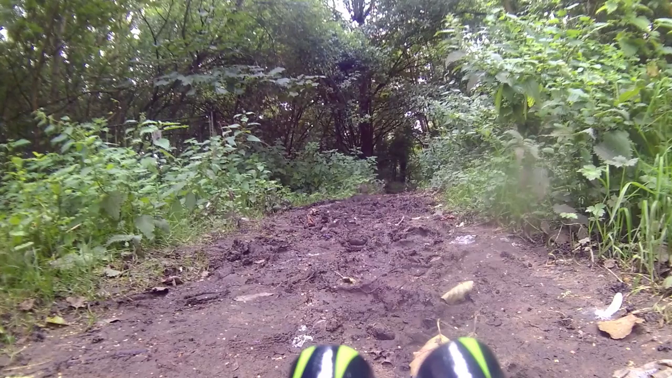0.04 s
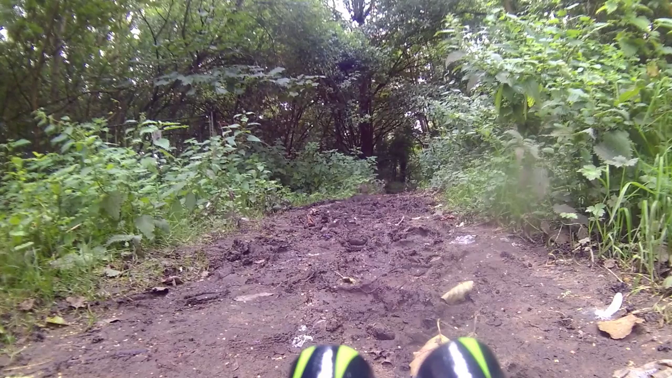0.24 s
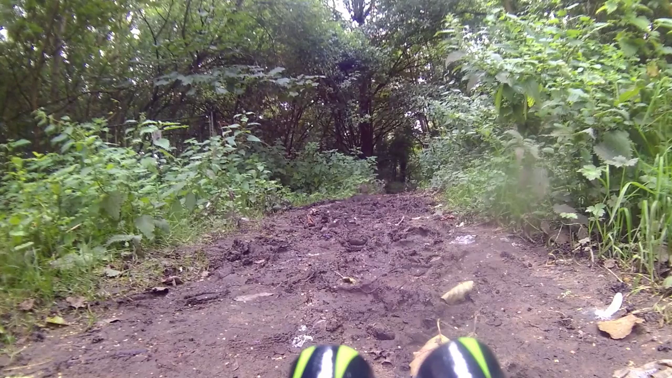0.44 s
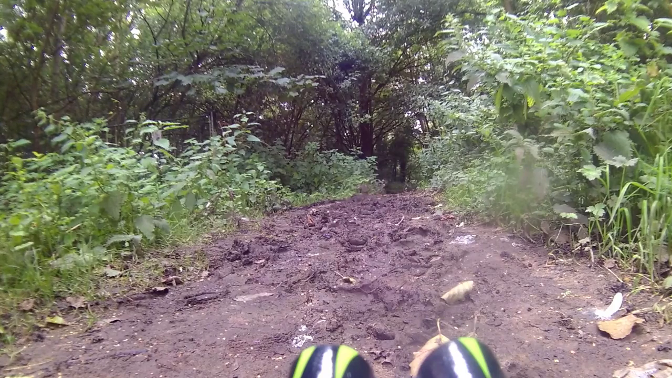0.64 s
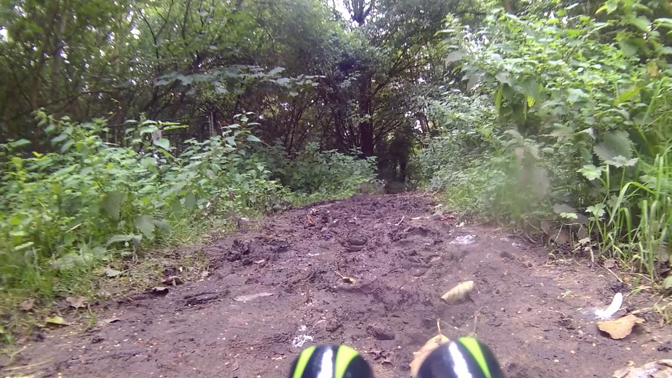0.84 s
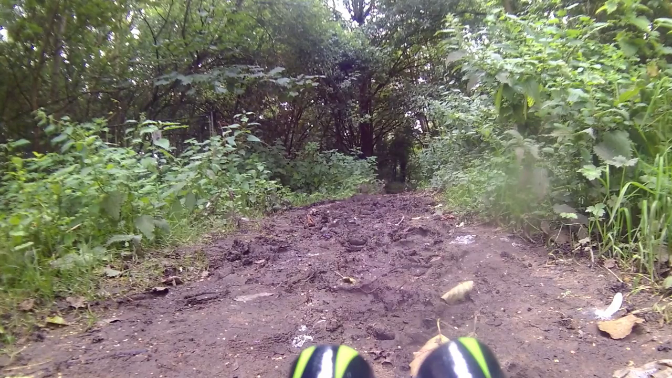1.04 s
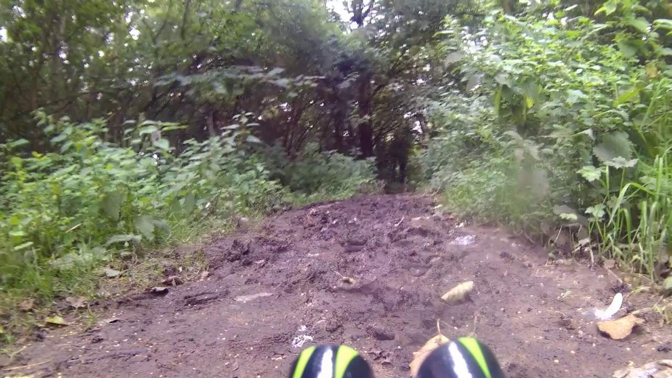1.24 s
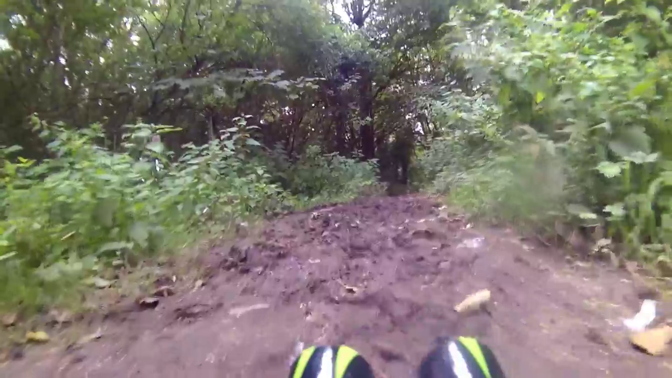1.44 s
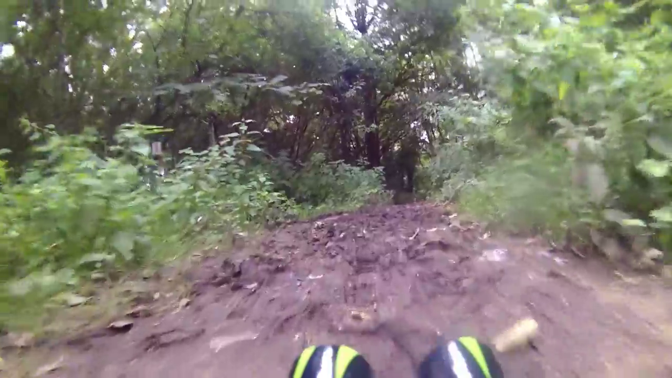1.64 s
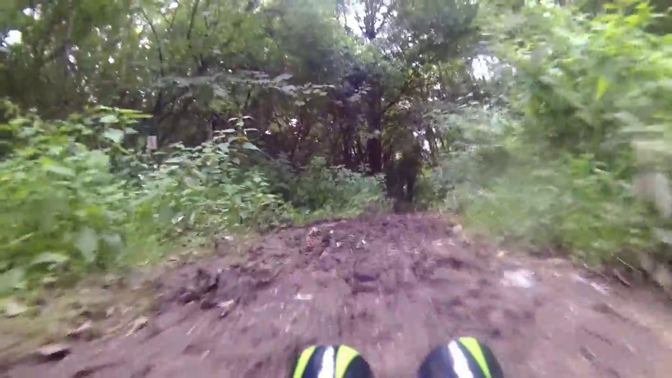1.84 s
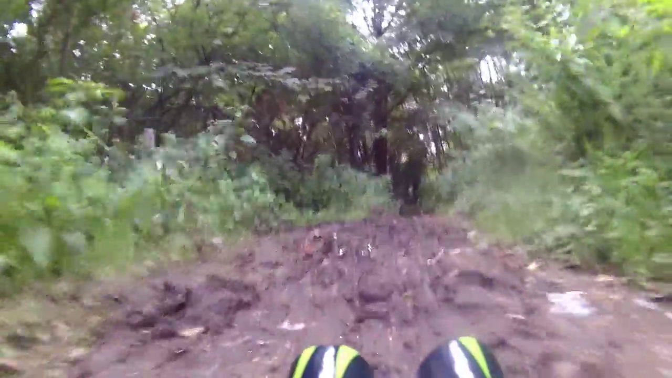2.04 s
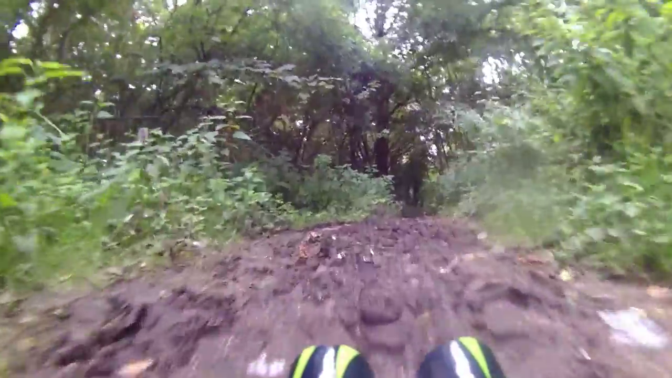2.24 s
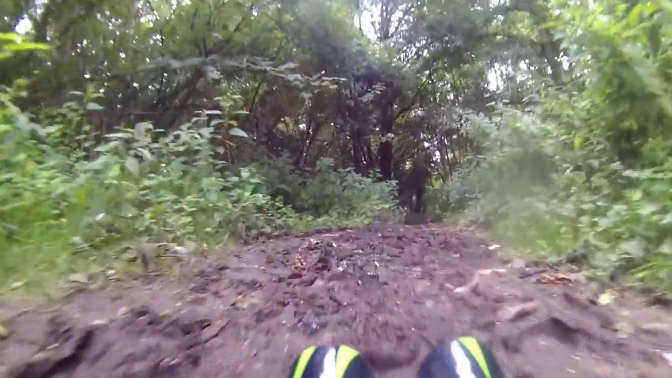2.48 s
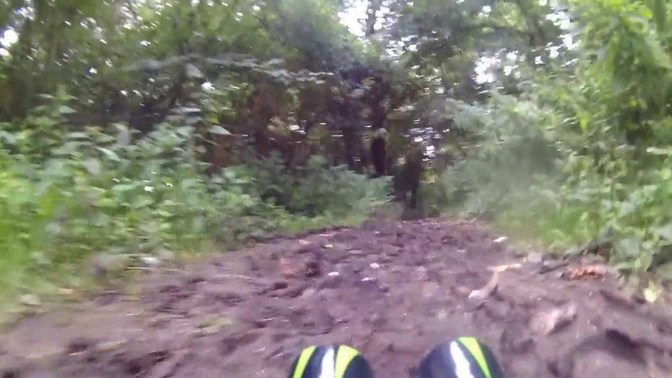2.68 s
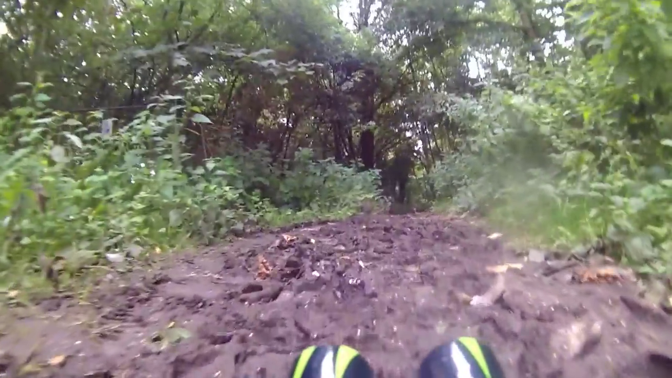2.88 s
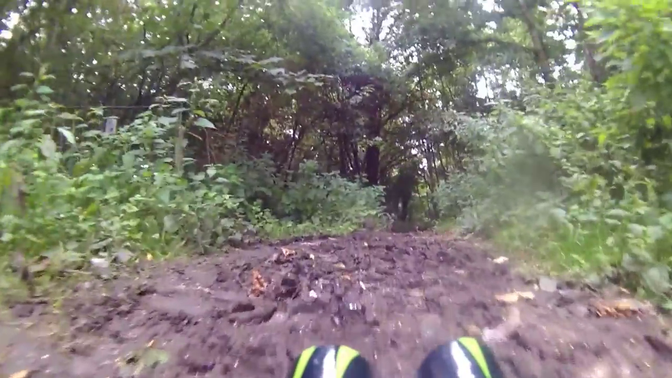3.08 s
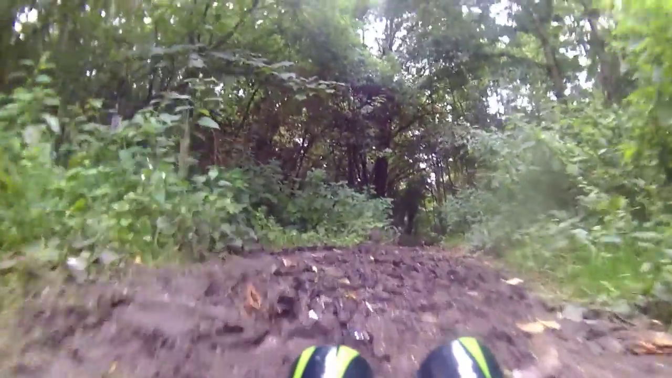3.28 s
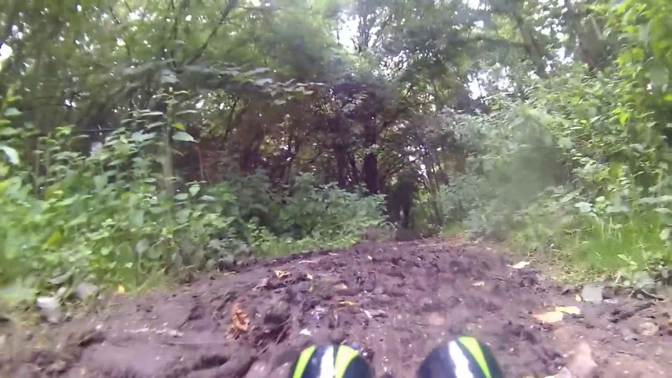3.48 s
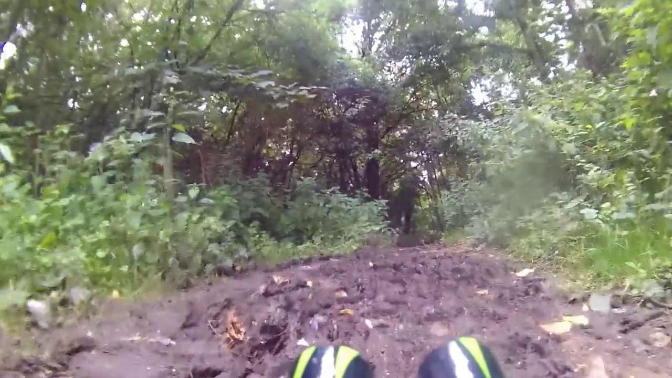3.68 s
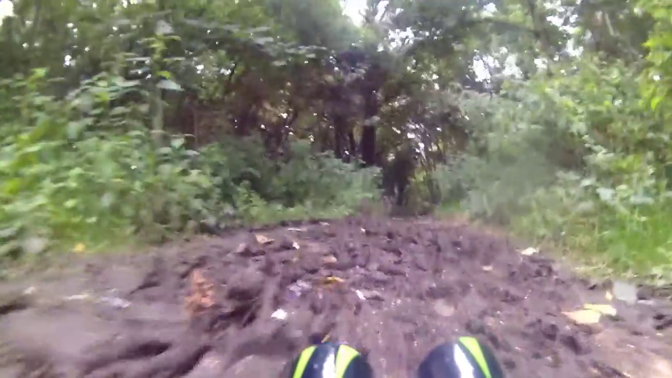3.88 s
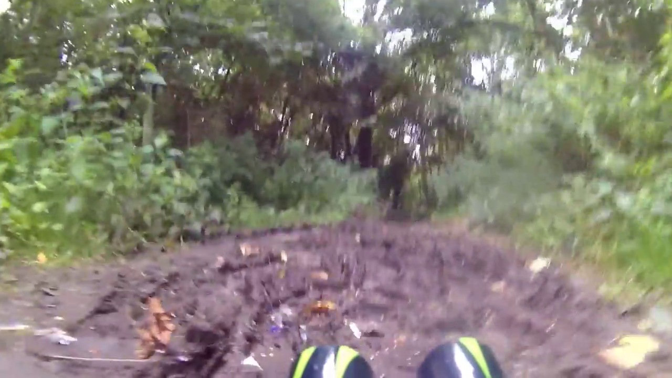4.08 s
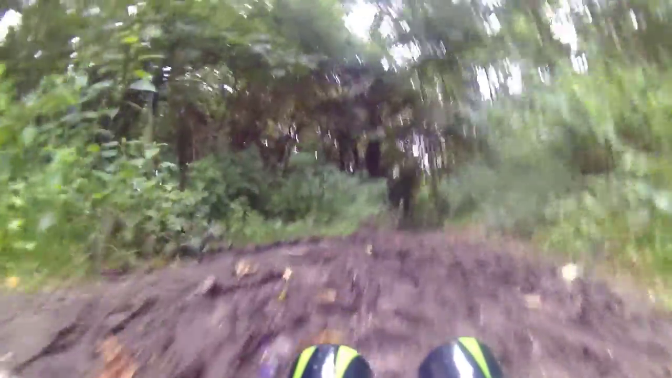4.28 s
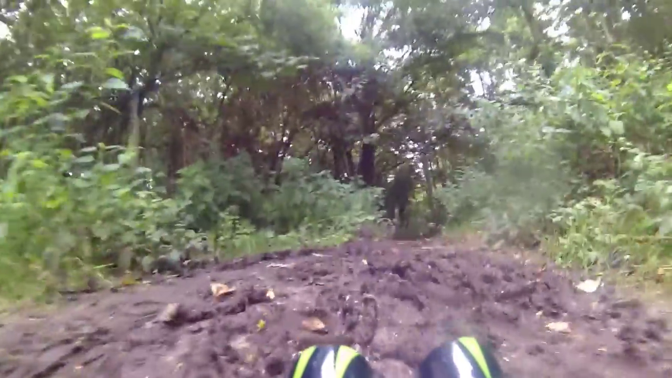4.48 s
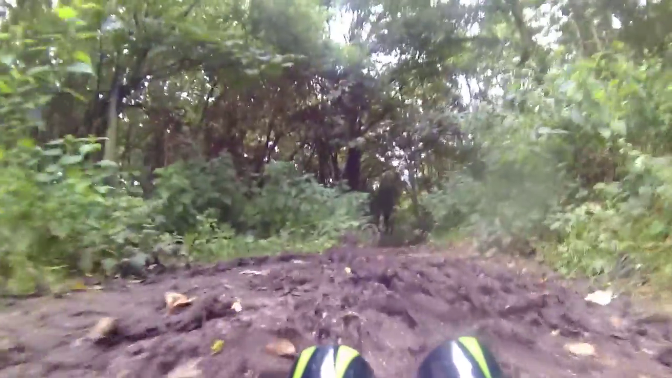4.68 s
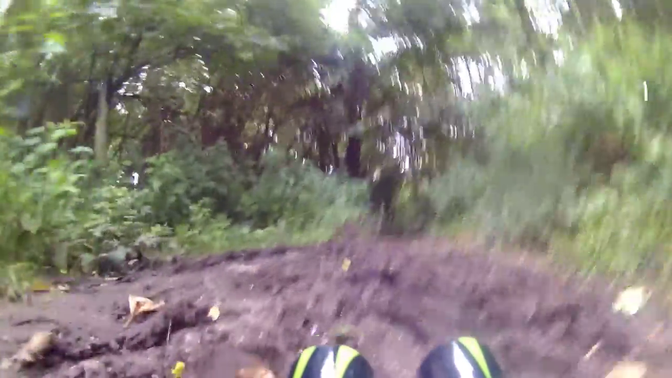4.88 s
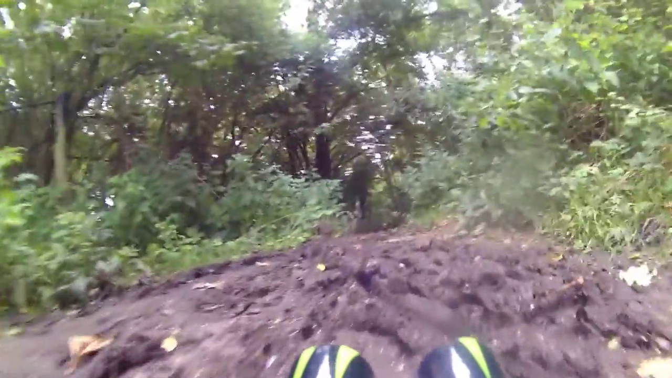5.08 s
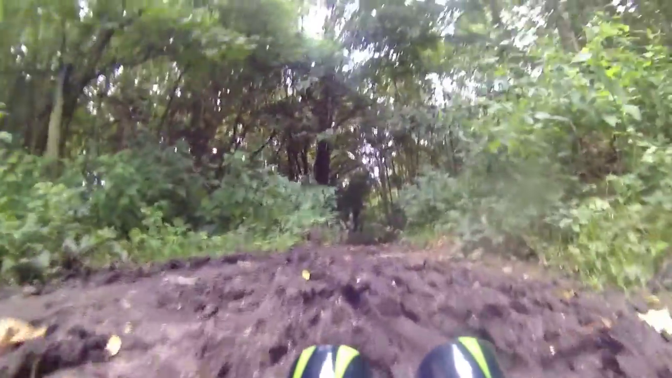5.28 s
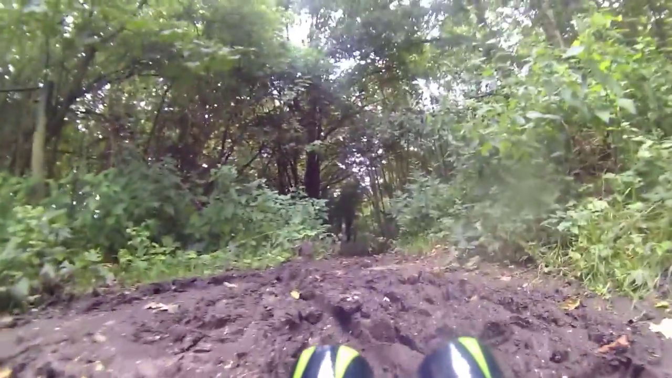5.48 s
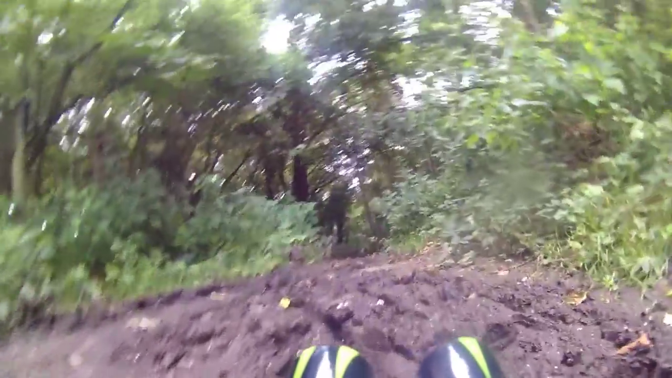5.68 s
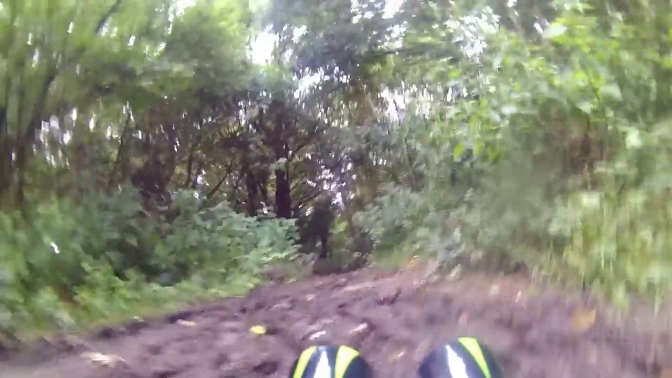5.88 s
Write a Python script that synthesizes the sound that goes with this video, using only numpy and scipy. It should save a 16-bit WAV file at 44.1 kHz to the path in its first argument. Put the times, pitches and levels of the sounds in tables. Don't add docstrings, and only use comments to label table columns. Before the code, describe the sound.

A second of soft amplifier hiss, still woodland air and a faint pulsing insect. Then a small remote-controlled truck lurches off with a yelp, its gear whine climbing in pitch while the controller whistles steadily. Throttle cuts bring loose clunks, then uneven surges. A microphone in a boxed camera on the body hears everything close, boxy and dry, on the left only; the right carries hiss.

```python
import sys
import numpy as np
from scipy import signal
from scipy.io import wavfile
from scipy.ndimage import uniform_filter1d

SR = 44100
rng = np.random.default_rng(int(sys.argv[2]) if len(sys.argv) > 2 else 0)


def undo_db(level):
    steps = np.asarray(level, float) / 20
    return 10 ** steps


def wav_record(signal):
    frames = np.transpose(np.atleast_2d(signal))
    bounded = np.clip(frames, -1, 1)
    quanta = np.round(bounded * 32767).astype(np.int16)
    wavfile.write(sys.argv[1], SR, quanta)


N = 261323
TIME = np.arange(N) / SR

# pitch_hz, level_db
HISS_COLOUR = [(30, -34), (150, -16), (300, -6), (600, 0), (7000, -1.5), (12000, 0), (16000, 0)]
# pitch_hz, level_db
AIR_COLOUR = [(24, -89), (40, -31.5), (378, -13.5), (410, -15), (484, -17.5), (645, -10), (701, -8),
              (746, -17.5), (861, -15), (1200, -16), (1270, -19), (1920, -23), (3870, -31), (4380, -15),
              (5500, -42), (7150, -55.5), (12100, -120)]
# pitch_hz, level_db
IDLE_HUMS = [(759, -63.5), (1211, -78.5), (4226, -80.5)]
# start_s, end_s, level_db
INSECT_TRILLS = [(.05, 0.228, -75), (0.274, .67, -75.5), (0.71, 0.933, -74.5), (.99, 1.103, -76),
                 (2.588, 2.783, -75), (3.2, 3.418, -74.5)]

# start_s, end_s
POWER_ON = [(1.058, 1.875), (1.885, 1.9), (2.118, 2.123), (2.146, 2.5), (2.515, 2.532), (2.789, 3.158),
            (3.222, 3.234), (3.414, 3.43), (3.445, 5.685), (5.7, 5.93)]
# time_s, level_db
MOTOR_LOAD = [(1.06, -47), (1.14, -43.5), (1.64, -56), (2.13, -45), (2.22, -44), (2.5, -51), (2.78, -45),
              (2.85, -41), (3.12, -46), (3.42, -44), (3.51, -48), (3.61, -38.5), (3.8, -47.5),
              (5.12, -46.5), (5.22, -49), (5.56, -37), (5.84, -44), (5.92, -33)]
# multiple, level_db
WHISTLE_MULTIPLES = [(2, 3.5), (3, 6.5), (4, -17)]
SWITCH_HZ = 1479.3
SECOND_DB, SECOND_DB_PER_OCTAVE = -66, -0.5
THIRD_DB, STRAIN_DB, STRAIN_SHARE = -61.5, -59, 0.2

# time_s, pitch_hz
SURGES = [
    [(1.18, 320), (1.27, 420), (1.32, 590), (1.37, 630), (1.45, 820), (1.5, 860), (1.6, 1010), (1.7, 1110),
     (1.89, 1225)],
    [(2.07, 684), (2.122, 800), (2.212, 900), (2.266, 715)],
    [(2.28, 760), (2.3, 830), (2.39, 797), (2.456, 873), (2.55, 823)],
    [(2.87, 504), (2.892, 454), (2.93, 575), (3.03, 660), (3.05, 625), (3.165, 655)],
    [(3.57, 376), (3.62, 530), (3.72, 809), (3.84, 796), (3.88, 712), (3.91, 767), (3.96, 692), (4.0, 810),
     (4.25, 900)],
    [(4.25, 900), (4.3, 810), (4.33, 602), (4.4, 800), (4.43, 741), (4.49, 832), (4.72, 797), (4.75, 620),
     (4.77, 320)],
    [(4.8, 290), (4.85, 558), (4.93, 649), (4.96, 603), (5.07, 825), (5.12, 640), (5.23, 416), (5.4, 297),
     (5.5, 370)],
    [(5.5, 370), (5.57, 470), (5.62, 620), (5.67, 800), (5.7, 670), (5.74, 830), (5.82, 743), (5.87, 905),
     (5.91, 780)],
]
SURGE_LEVELS = [-40, -46, -39, -39, -38, -37, -41, -37]
# multiple, level_db
TOOTH_MULTIPLES = [(.5, -23), (1, 0), (2, -6), (3, -12), (4, -16)]
# time_s, yelp_level_db, yelp_pitch_hz, rattle_level_db
JERKS = [
    (1.125, -26, 800, -30),
    (1.16, -40, 700, -41.5),
    (2.236, -28, 900, -27.5),
    (2.854, -39, 950, -26.5),
    (3.507, -34.5, 760, -29),
    (4.214, -31, 1000, -31),
]
REFERENCE_HZ, SLOW_DB_PER_OCTAVE, SURGE_FADE_S = 800, 6.0, .025
CRAWL_HZ, CRAWL_DB_PER_OCTAVE = 600, 10.5
SLOWING_DB = -3.0
THROB_DB, THROB_DB_PER_OCTAVE, WAVER_HZ = 4.4, .8, 18
JERK_S, YELP_SHARE, YELP_FALL_HZ_PER_S = 0.011, 0.76, 7500

# time_s, level_db
SHAKE = [(1.05, -43.5), (1.09, -33.5), (1.18, -45), (1.23, -34), (1.84, -30), (2.04, -42.5), (2.11, -24),
         (2.15, -37), (2.53, -32.5), (2.58, -44), (2.79, -38), (3.09, -31.5), (3.2, -42.5), (3.36, -47.5),
         (3.4, -68), (3.44, -41.5), (3.55, -36), (3.59, -32.5)]
# pitch_hz, level_db
SHELL = [(35, -75), (60, -29.5), (160, -42), (364, -17.5), (452, -17.5), (846, 1.5), (1380, -11.5),
         (1520, -14.5), (1930, -22.5), (2640, -28), (2910, -22.5), (3270, -30), (4570, -31), (4840, -36),
         (6500, -52), (8450, -77), (14300, -120)]
# pitch_hz, width_hz, level_db
SHELL_MODES = [(276, 41, 9.5), (833, 204, 5.5), (1075, 90, 5.5), (1280, 140, 6.5), (1642, 247, 11.5),
               (2180, 100, 3.5), (2710, 105, -0.5), (3694, 450, 6), (4740, 480, -11)]
# pitch_hz, level_db
GRIT_COLOUR = [(2710, -31.5), (4600, -8), (4790, -9), (6980, -16), (7610, -15), (14300, -20),
               (15500, -25.5)]
# pitch_hz, level_db
TYRE_COLOUR = [(25, -20.5), (60, -32.5), (150, -11), (290, 6), (420, 2.5), (600, -3.5), (1000, -27.5)]
# time_s, level_db
STONES = [(1.561, -44), (1.8708, -58), (2.9313, -45), (3.6332, -50), (3.6667, -52), (3.8772, -51),
          (4.0043, -47), (4.3216, -40), (4.416, -33), (4.4938, -54), (4.6699, -55), (5.2211, -58),
          (5.3459, -52), (5.6826, -41), (5.7729, -49), (5.8298, -46)]
# time_s, blow_level_db, crack_db (relative to the blow)
KNOCKS = [(1.059, -50, -44), (1.103, -33, -14), (1.401, -29.5, -35), (1.485, -16, -30), (1.626, -19.5, -28),
          (1.756, -28, -23), (1.809, -20, -43), (2.226, -22.5, -44), (2.312, -20.5, -29),
          (2.406, -23.5, -31), (2.474, -25, -37), (2.826, -34, -36), (2.884, -22, -30), (3.475, -29, -46),
          (3.593, -37, -21), (3.656, -24.5, -32), (3.723, -22, -25), (3.778, -23, -28), (3.974, -37, -15),
          (4.054, -16, -29), (4.139, -28, -30), (3.878, -37, -25), (4.416, -46, -12), (4.468, -21.5, -23),
          (4.55, -21.5, -29), (4.632, -20.5, -29), (4.718, -17.5, -34), (5.062, -18.5, -29),
          (5.746, -18, -32), (5.862, -18.5, -28)]
# time_s, blow_level_db
BUMPS = [(1.081, -38), (1.936, -56), (1.985, -27), (2.059, -28.5), (2.11, -49), (2.619, -27),
         (2.677, -23.5), (2.7, -43), (2.73, -20), (2.785, -32), (3.18, -37), (3.225, -30.5), (3.281, -29.5),
         (3.328, -29), (3.354, -31), (5.343, -28), (5.546, -29), (5.65, -19.5), (5.91, -14)]
SHAKE_DB_PER_OCTAVE = 1
LOOSE_DB = 3
SHARP_DRIVEN_DB, SHARP_COASTING_DB, SHARP_DB_PER_OCTAVE, SHARP_WANDER_DB = -13, -18.5, 7, 0.5
GRIT_DRIVEN_DB, GRIT_COASTING_DB, GRIT_DB_PER_OCTAVE, GRIT_WANDER_DB = -31.5, -35.5, 2.5, 2.5
TYRES_DB, TYRES_SHARE, ROLLING_DB = -55.5, 0.37, -32.5
KNOCK_S, BUMP_S, BUMP_CRACK_DB, BUMP_HZ, RING_LOW_HZ = .0075, .008, -38, 840, 740
STONE_S, STONE_GAIN_DB = 0.0016, -14


def evened(x):
    return x / np.sqrt(np.mean(x ** 2) + 1e-20)


def read(points, hz):
    table_hz, value = np.transpose(points)
    return np.interp(np.log(hz + 1), np.log(table_hz + 1), value)


def follow(rows):
    s, *columns = np.transpose(rows)
    return [uniform_filter1d(np.interp(TIME, s, column), size=300) for column in columns]


def gate(on, off, edge):
    return np.clip(np.minimum(TIME - on, off - TIME) / edge, 0, 1)


def bell(s, width):
    return np.exp(-.5 * ((TIME - s) / width) ** 2)


def noise():
    return rng.standard_normal(N)


def drift(hz):
    return evened(signal.lfilter(*signal.butter(2, hz, fs=SR), noise()))


def colour(x, shape_db):
    hz = abs(np.fft.fftfreq(8192, 1 / SR))
    log_gain = np.log(undo_db(np.maximum(shape_db(hz), -100)))
    taps = np.fft.ifft(np.exp(np.conj(signal.hilbert(log_gain)))).real[:4096]
    return signal.oaconvolve(x, taps / np.linalg.norm(taps))[:N]


def clicks(per_s, spread_db):
    size = undo_db(spread_db * np.minimum(rng.exponential(1, N), 4))
    sign = rng.choice([-1., 1.], N)
    return evened(size * sign * (rng.random(N) < per_s / SR))


def hiss():
    return colour(noise(), lambda hz: read(HISS_COLOUR, hz))


def insect():
    song = sum(undo_db(db) * gate(start, end, 0.0062) for start, end, db in INSECT_TRILLS)
    pulses = (.5 + .5 * np.cos(2 * np.pi * 32.0 * TIME + 1.1 * drift(hz=5.6))) ** 0.57
    band = signal.butter(2, [7200, 8500], "band", fs=SR, output="sos")
    return 2.0 * song * pulses * evened(signal.sosfilt(band, noise()))


def wood():
    air = undo_db(-66 + 3.5) * colour(noise(), lambda hz: read(AIR_COLOUR, hz))
    hum = sum(undo_db(db + 0.71 * drift(hz=22)) * np.sqrt(2) * np.cos(2 * np.pi * hz * TIME)
              for hz, db in IDLE_HUMS)
    return air + hum + insect()


def powered():
    return sum(gate(start, end, 0.00052) for start, end in POWER_ON)


def speed():
    return follow(sum(SURGES, []))[0]


def controller():
    first_db, = follow(MOTOR_LOAD)
    second_db = SECOND_DB + SECOND_DB_PER_OCTAVE * np.log2(speed() / REFERENCE_HZ)
    third_db = THIRD_DB - STRAIN_SHARE * np.maximum(first_db - STRAIN_DB, 0)
    phase = 2 * np.pi * SWITCH_HZ * TIME + 0.57 * drift(hz=1.4)
    tone = undo_db(first_db - 4.0 + 1.0 * drift(hz=50)) * np.cos(phase)
    for (k, db), level_db in zip(WHISTLE_MULTIPLES, (second_db, third_db, third_db)):
        flutter_db = 3.16 * drift(hz=115)
        tone += undo_db(level_db + db + flutter_db) * np.cos(k * phase + 0.18 * drift(hz=90))
    high_phase = 2 * np.pi * 6015 * TIME + 1.1 * drift(hz=27)
    tone += undo_db(third_db - 13.5 + 3.0 * drift(hz=30)) * np.cos(high_phase)
    return np.sqrt(2) * powered() * tone


def shell_db(hz):
    modes = sum(db / (1 + (2 * (hz - f) / width) ** 2) for f, width, db in SHELL_MODES)
    return read(SHELL, hz) + modes


def blows():
    low, crack, ring = np.zeros((3, N))
    knock_hz = np.maximum(speed(), RING_LOW_HZ)
    rows = [(s, db, crack_db, knock_hz[round(s * SR)], KNOCK_S) for s, db, crack_db in KNOCKS]
    rows += [(s, db, BUMP_CRACK_DB, BUMP_HZ, BUMP_S) for s, db in BUMPS]
    for s, db, crack_db, hz, length in rows:
        start = round(s * SR)
        part = slice(start, start + 6000)
        t = TIME[part] - TIME[part][0]
        shape = t / length * np.exp(1 - t / length)
        low[part] += undo_db(db - 20.0) * shape
        crack[part] += undo_db(db + crack_db - 10.5) * shape ** 3.6
        falling_tone = np.sin(2 * np.pi * hz * t * (1 - 2.44 * t))
        ring[part] += undo_db(db - 8.5) * shape ** 2.2 * falling_tone
    return low, crack, ring


def rattle():
    level_db, = follow(SHAKE)
    octaves = np.log2(speed() / REFERENCE_HZ)
    driven = uniform_filter1d(powered(), size=1500)
    sharp_db = SHARP_COASTING_DB + (SHARP_DRIVEN_DB - SHARP_COASTING_DB) * driven
    sharp_db += SHARP_DB_PER_OCTAVE * octaves + SHARP_WANDER_DB * drift(hz=26.8)
    grit_db = GRIT_COASTING_DB + (GRIT_DRIVEN_DB - GRIT_COASTING_DB) * driven
    grit_db += GRIT_DB_PER_OCTAVE * octaves + GRIT_WANDER_DB * drift(hz=30)
    tyres_db = TYRES_DB + TYRES_SHARE * (level_db - ROLLING_DB) - level_db

    low, crack, ring = blows()
    jerks = sum(undo_db(db) * bell(s, JERK_S) for s, _, _, db in JERKS)
    stones = sum(undo_db(db + STONE_GAIN_DB) * bell(s + STONE_S, STONE_S) for s, db in STONES)
    chatter_db = LOOSE_DB * (1 - driven) * np.minimum(drift(hz=21.2), 1)
    shaking_db = level_db + SHAKE_DB_PER_OCTAVE * octaves + chatter_db + 1.29 * drift(hz=41.5)
    shaking = undo_db(shaking_db) * gate(SHAKE[0][0], 7, 0.0093)

    body = clicks(per_s=5000, spread_db=1.5) * (undo_db(-4.0) * (shaking + jerks) + low)
    hard = clicks(per_s=2500, spread_db=2.0) * (undo_db(sharp_db + 17.0) * shaking + undo_db(6.5) * jerks + 0.12 * low)
    spray = clicks(per_s=7800, spread_db=5.5) * (undo_db(grit_db) * shaking + undo_db(-28.0) * jerks + crack + stones)
    roll = clicks(per_s=1500, spread_db=-0.5) * (undo_db(tyres_db - 2.5) * shaking + undo_db(-26.0) * jerks)

    body = colour(body, shell_db)
    treble = signal.butter(3, 1900, "high", fs=SR, output="sos")
    body += signal.sosfilt(treble, colour(hard, shell_db) - 0.42 * body)
    spray = colour(spray, lambda hz: read(GRIT_COLOUR, hz))
    roll = colour(roll, lambda hz: read(TYRE_COLOUR, hz))
    return body + ring + spray + roll


def strokes():
    for rows, db in zip(SURGES, SURGE_LEVELS):
        hz, = follow(rows)
        fade = gate(rows[0][0] - SURGE_FADE_S / 2, rows[-1][0] + SURGE_FADE_S / 2, SURGE_FADE_S)
        slow_db = SLOW_DB_PER_OCTAVE * np.minimum(np.log2(hz / REFERENCE_HZ), 0)
        crawl_db = CRAWL_DB_PER_OCTAVE * np.minimum(np.log2(hz / CRAWL_HZ), 0)
        yield hz, fade * undo_db(db + slow_db + crawl_db)
    for s, db, hz, _ in JERKS:
        falling_hz = np.clip(hz - YELP_FALL_HZ_PER_S * (TIME - s), 400, 1400)
        yield falling_hz, undo_db(db) * bell(s, YELP_SHARE * JERK_S)


def gears():
    out = np.zeros(N)
    waver, throb = drift(hz=35), np.clip(drift(hz=30), -3, 1.5)
    patchy_db = [4 * np.minimum(drift(hz=25), 1.5) for _ in TOOTH_MULTIPLES]
    for hz, level in strokes():
        on = level > 1e-6
        turns = np.cumsum(hz + WAVER_HZ * waver)[on] / SR
        throb_db = (THROB_DB + THROB_DB_PER_OCTAVE * np.log2(hz[on] / REFERENCE_HZ)) * throb[on]
        pinion = 1 + 0.36 * np.cos(2 * np.pi * turns / 12.0)
        size = level[on] * undo_db(throb_db) * pinion
        slowing = uniform_filter1d(1. * (np.gradient(hz) < 0), size=2000)[on]
        for (k, db), own_db in zip(TOOTH_MULTIPLES, patchy_db):
            if k > 1:
                db = db + SLOWING_DB * slowing + own_db[on]
            tint_db = 0.74 * (shell_db(k * hz[on]) - shell_db(hz[on]))
            out[on] += size * undo_db(db + tint_db) * np.cos(2 * np.pi * k * turns)
    return undo_db(4.5) * out


def scene():
    truck = undo_db(3.5) * (gears() + rattle() + controller())
    return np.array([truck + wood(), np.zeros(N)])


def thinned(x):
    mid, side = (x[0] + x[1]) / 2, (x[0] - x[1]) / 2
    hz, t, z = signal.stft(mid, SR, nperseg=2048)
    power = abs(z) ** 2

    def spread(bands):
        return bands.repeat(24, axis=0)[:len(hz)]

    bands = uniform_filter1d(power, size=24, axis=0)[::24]
    top_db = 5 * np.log10(spread(bands) * power[hz > 9000].mean(0) + 1e-40)
    busy = 10 * np.log10(power.sum(0) + 1e-20) > -62
    quiet_db = np.median(top_db[hz > 12000][:, t < 1])
    limit_db = quiet_db + .1 + 2.3 * busy + np.clip((hz[:, None] - 12300) / 400, -30, 0)
    limit_db += .9 * spread(rng.standard_normal(bands.shape))
    mid = signal.istft(z * (top_db > limit_db), SR, nperseg=2048)[1][:N]
    return np.array([mid + side, mid - side])


def low_pass(x):
    return signal.sosfilt(signal.butter(12, 15690, fs=SR, output="sos"), x)


def record(dry):
    noises = np.array([hiss() for _ in dry]) * undo_db([[-64.5], [-65.5]])
    noises[1] += undo_db(-95) * np.cos(2 * np.pi * 8499.4 * TIME)
    mix = thinned(dry + noises) * gate(-1, 5.927, .003)
    return low_pass(mix)


dry = scene()
out = record(dry)
wav_record(out)
```